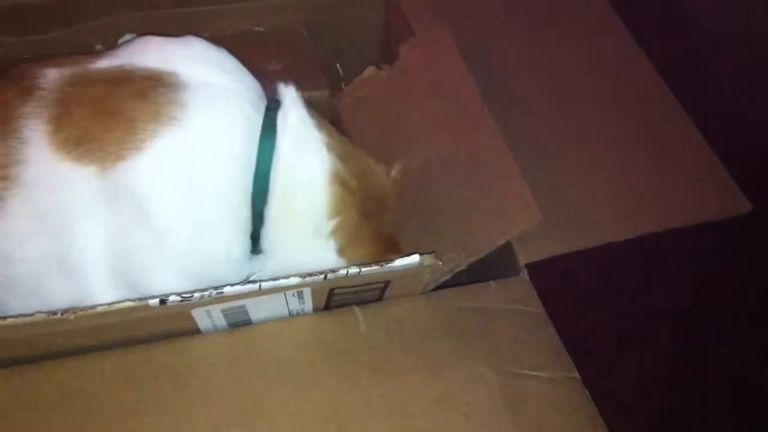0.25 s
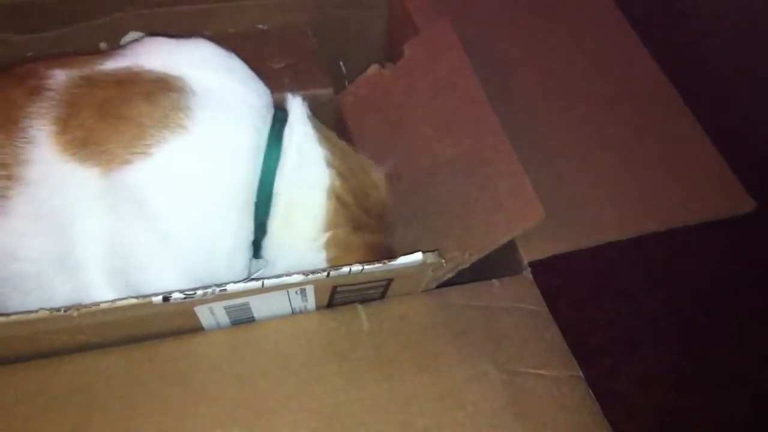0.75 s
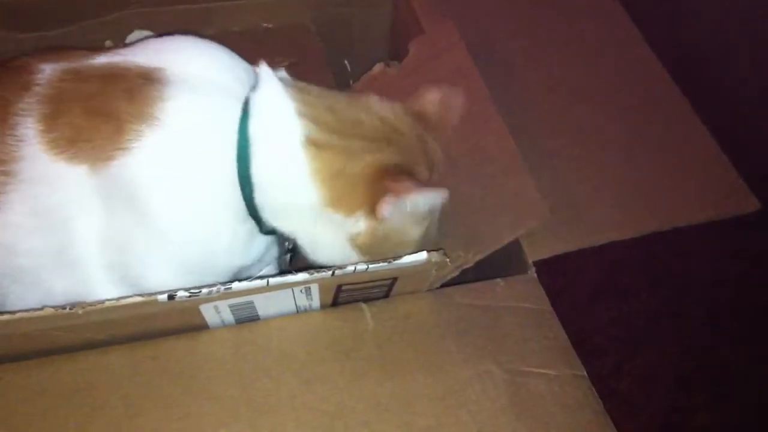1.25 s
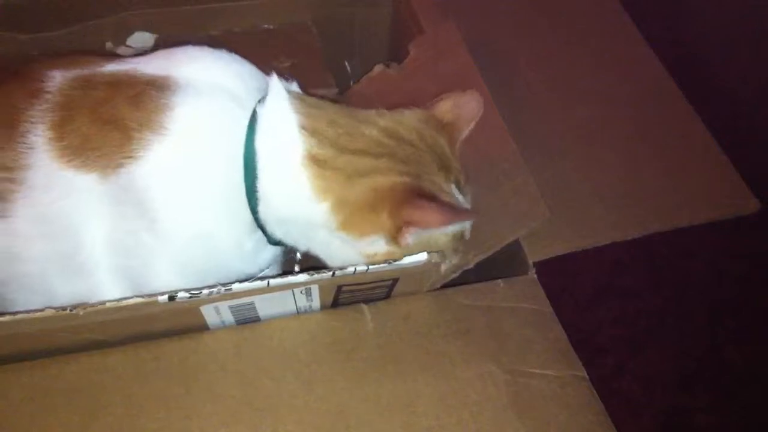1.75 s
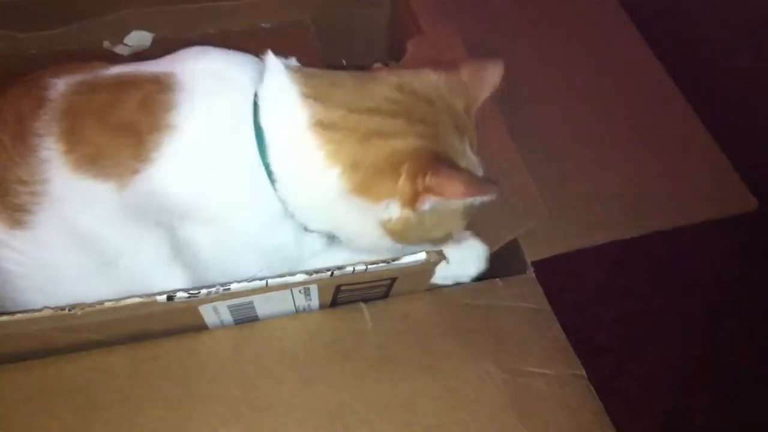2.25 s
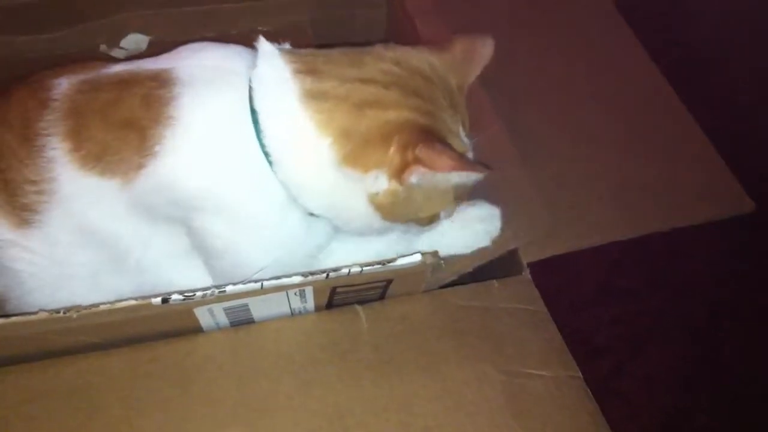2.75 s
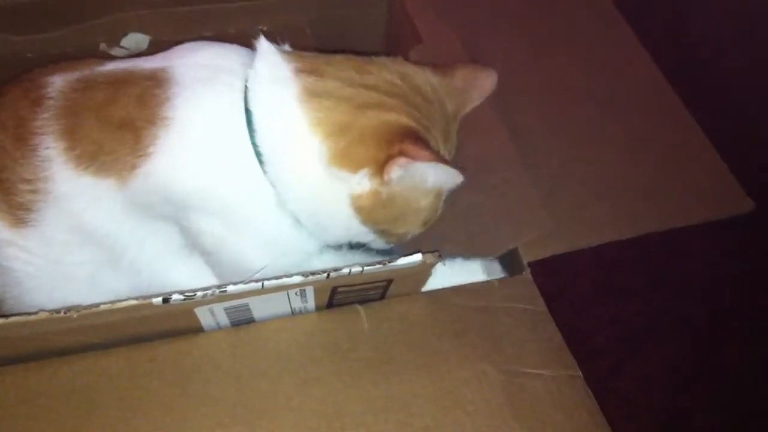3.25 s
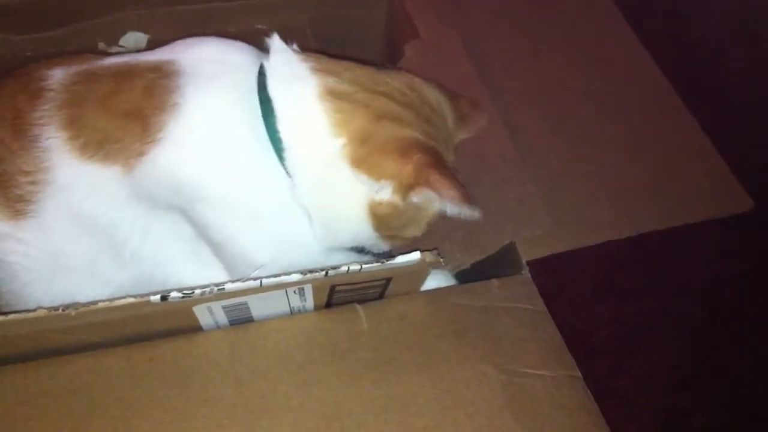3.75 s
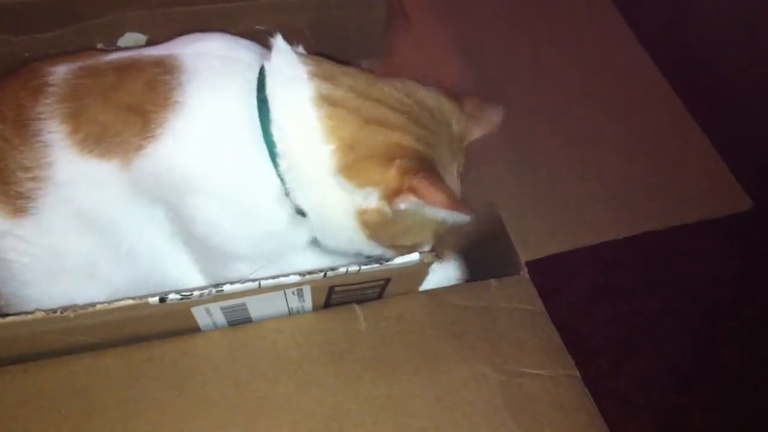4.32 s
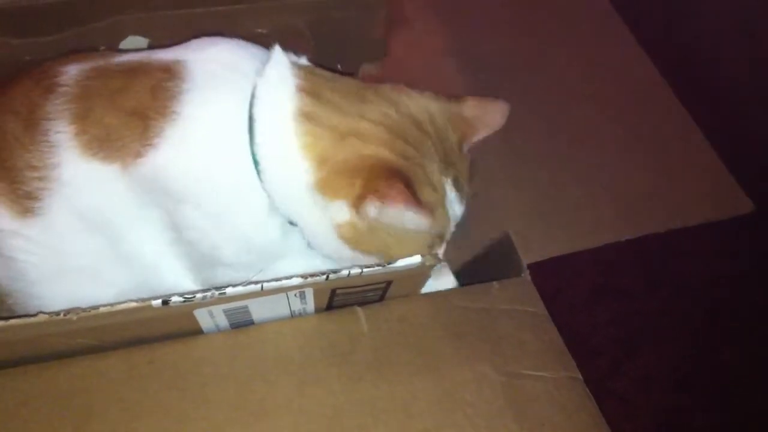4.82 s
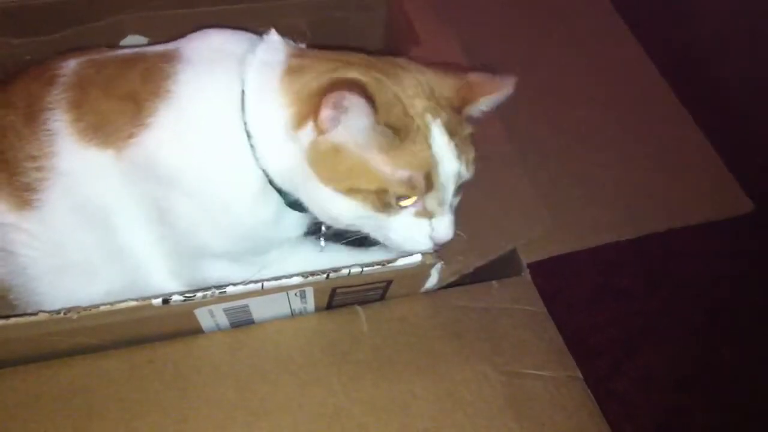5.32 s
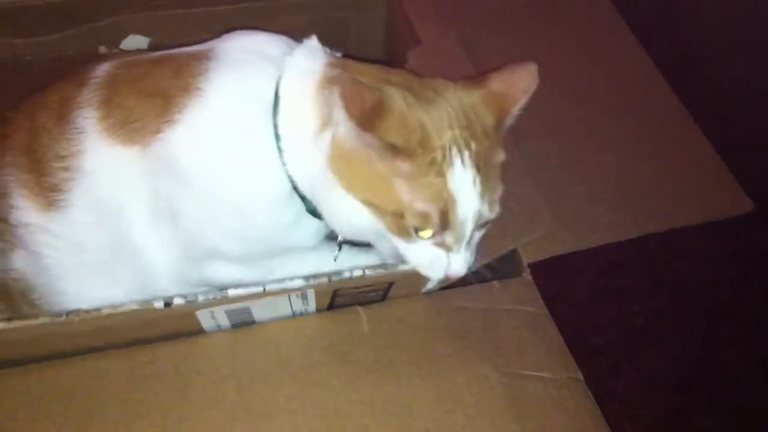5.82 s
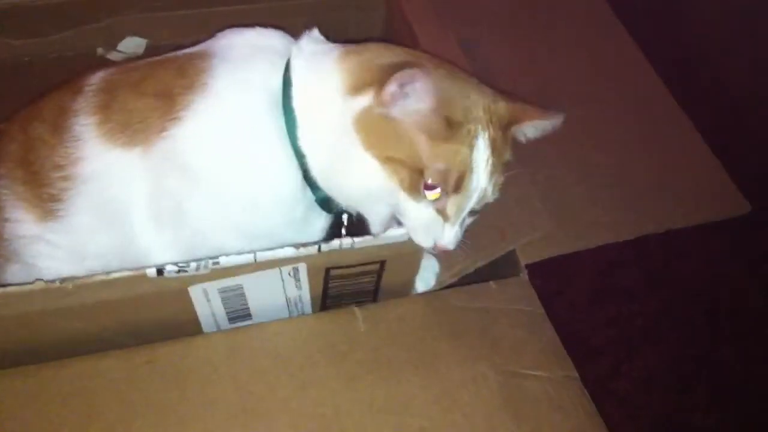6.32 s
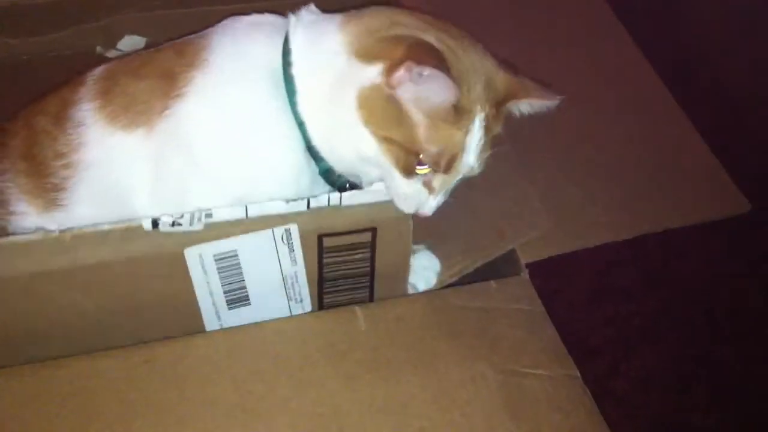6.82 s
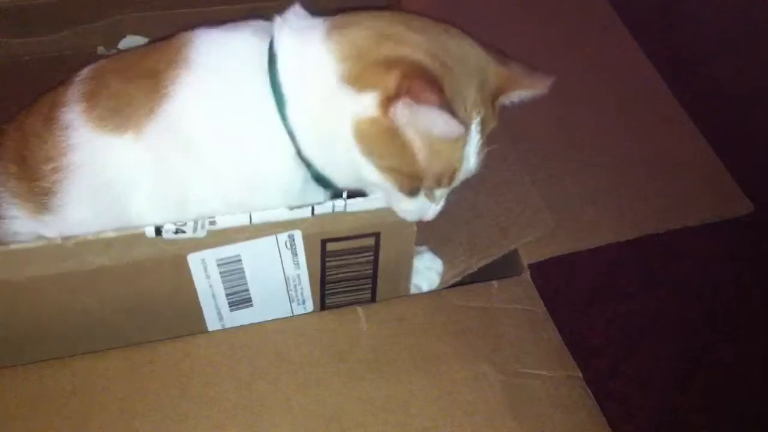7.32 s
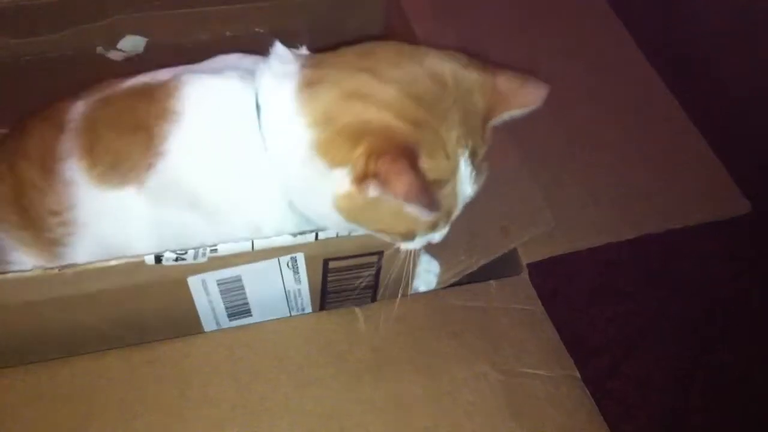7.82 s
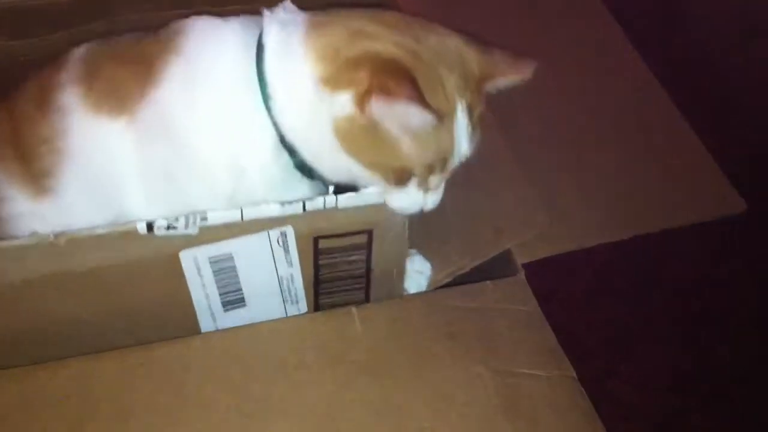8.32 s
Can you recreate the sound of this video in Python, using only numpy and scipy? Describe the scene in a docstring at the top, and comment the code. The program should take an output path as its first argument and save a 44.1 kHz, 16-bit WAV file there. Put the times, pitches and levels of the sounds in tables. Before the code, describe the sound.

Hollow cardboard flap snaps as a cat claws a box, with faint rustling, scratchy crackles and one dry knock.

```python
"""A cat plucking a cardboard box

A cat lying in a box hooks the edge of a flap with its claw; the card snaps back and the box rings. Between the
plucks come close rustles, crackles and ticks from fur, card and handling of the camera, and a tooth tapping the
stiff edge. A quiet, humming room gives back a short echo."""
import sys
import numpy as np
from scipy import signal
from scipy.fft import rfft, irfft, next_fast_len
from scipy.io import wavfile
from scipy.ndimage import uniform_filter1d

SR = 44100
rng = np.random.default_rng(int(sys.argv[2]) if len(sys.argv) > 2 else 0)


def master(y):
    """Save y as 16-bit WAV."""
    cut = np.clip(np.atleast_2d(y).T, -1, 1)
    pcm = np.round(cut * 32767)  # scale
    wavfile.write(sys.argv[1], SR, pcm.astype(np.int16))


N = 377937


def gain_of(db):
    """Turns decibels into a factor to multiply by."""
    return 10 ** (np.asarray(db) / 20)


def unit_level(x):
    """Scales a sound so that its average level (rms) is 1."""
    return x / np.sqrt(np.mean(x ** 2) + 1e-20)


def value_at(curve, hz):
    """Reads between the points of a curve, with pitch spaced in octaves."""
    points_hz, values = np.transpose(curve)
    return np.interp(np.log(hz + 1), np.log(points_hz + 1), values)


def add(mix, start_s, sound):
    """Mixes a sound in at the given time."""
    part = mix[round(start_s * SR):][:len(sound)]
    part += sound[:len(part)]


def filtered(x, spectrum):
    """Turns each pitch up or down, following (Hz, dB) points."""
    size = next_fast_len(len(x))
    gains = gain_of(value_at(spectrum, np.fft.rfftfreq(size, 1 / SR)))
    return irfft(rfft(x, size) * gains, size)[:len(x)]


def coloured(x, spectrum):
    """Filters a sound, then scales it to level 1."""
    return unit_level(filtered(x, spectrum))


# Room hum and microphone hiss. Each row: pitch in Hz, relative level in dB.
HUM_SPECTRUM = [(15, -57), (25, -16), (38, -29), (97, -15), (145, -3.5), (200, -2), (301, -2), (560, -13),
                (695, -16.5), (754, -10.5), (1070, -14.5), (1890, -16.5), (4250, -23), (16000, -25.5)]


def room_hum():
    """A steady hum and hiss with one faint, narrow drone."""
    drone = signal.lfilter(*signal.iirpeak(740, 30, SR), rng.standard_normal(N))
    hum = coloured(rng.standard_normal(N), HUM_SPECTRUM)
    return gain_of(-63) * (hum + gain_of(-16) * unit_level(drone))


# How long the room rings. Each row: pitch in Hz, seconds to fade by 60 dB (the "fade time").
ROOM_FADE = [(200, 0.5), (600, 0.3), (1500, 0.41), (4000, 0.28), (10000, 0.26)]


def room_echo(x, first_echo_s=0.01):
    """Many small echoes come off the walls, each pitch dying at its own speed."""
    echoes = np.zeros(SR // 2)
    slots = np.arange(round(first_echo_s * SR), len(echoes) - 20, 20)
    echoes[slots + rng.integers(0, 20, len(slots))] = rng.choice([-1., 1.], len(slots))
    hz, t, bands = signal.stft(echoes, SR, nperseg=256)
    bands *= gain_of(-60 * t / value_at(ROOM_FADE, hz)[:, None])
    spectrum = rfft(signal.istft(bands, SR, nperseg=256)[1])
    tail = irfft(spectrum / np.sqrt(uniform_filter1d(abs(spectrum) ** 2, size=60)))  # favour no pitch
    return signal.fftconvolve(x, tail / np.linalg.norm(tail))[:N]


# The bright, hissy treble of rustling close to the microphone.
# Each row: pitch in Hz, relative level in dB.
FIZZ_SPECTRUM = [(2000, -20), (3500, -11), (5500, -12), (6900, -16), (7700, -4), (10000, 0), (11200, -11),
                 (12500, -6), (14800, -2), (15700, -5), (16300, -20)]


def fizz(noise, sheen_hz=11200):
    """Turns noise into a bright fizz in two parts: the treble, and the very high "sheen" above it."""
    whole = coloured(noise, FIZZ_SPECTRUM)
    treble = signal.sosfiltfilt(signal.butter(6, sheen_hz, fs=SR, output="sos"), whole)
    return treble, whole - treble


def grains(per_s, spread_db, fade_s):
    """Rubbing surfaces catch and let go, making little puffs of noise of uneven size."""
    sizes = gain_of(spread_db * np.minimum(rng.exponential(1, N), 4))
    catches = rng.random(N) < per_s / SR
    puffs = signal.lfilter([1], [1, -np.exp(-1 / (fade_s * SR))], sizes * catches)
    return puffs * rng.standard_normal(N)


# The cat shifting its weight. Each row: time in seconds, treble level in dB, body level in dB.
WEIGHT_SHIFTS = [(0, -98, -88), (4.1, -81, -84.5), (4.5, -71, -81), (5.5, -79, -69.5), (6.3, -88, -68.5),
                 (6.7, -68.5, -63), (7.3, -67, -63), (7.601, -70.5, -69.5), (8.57, -71, -67.5)]
# Close rustles. Each row: start in seconds, length in seconds, treble level in dB,
# sheen in dB compared with the treble, body level in dB.
RUSTLES = [(1.949, 0.087, -65, -4, -66), (2.16, 0.079, -64.5, 0, -84), (2.488, 0.055, -64, 4, -56),
           (2.784, 0.15, -66, 1, -62), (3.04, 0.25, -64.5, 6.5, -63), (3.25, 0.11, -64, 3, -63),
           (3.348, 0.075, -64, 7, -61.5), (3.39, .17, -68, 5, -69.5), (3.564, 0.21, -65.5, 4, -66.5),
           (4.181, 0.15, -62.5, 2, -66), (4.384, 0.053, -67, 2, -68), (4.53, 0.26, -75, 13, -79),
           (4.74, 0.14, -72, 4, -73), (5.758, 0.16, -62.5, -5, -58.5), (5.911, 0.15, -72, -6, -60.5),
           (6.39, 0.08, -71, -2, -66), (6.756, 0.12, -51.5, -2, -56.5), (6.9, 0.11, -56, -6, -70),
           (7.004, 0.075, -59.5, -1, -68), (7.126, 0.099, -53, -3, -72), (7.2, 0.096, -52, 1, -57.5),
           (7.312, 0.11, -67, -5, -55.5), (7.781, 0.15, -66, -15, -58.5), (7.997, 0.14, -77, -4, -61.5),
           (8.218, 0.1, -69, -7, -58.5), (8.408, 0.087, -61, -4, -52.5), (8.505, 0.23, -58, -12, -41.5)]
# The lower sound, or body, of rubbed card. Each row: pitch in Hz, relative level in dB.
CARD_SPECTRUM = [(88, -40), (150, 8), (270, 2.5), (456, 4.5), (800, -2), (1300, 0.5), (1600, -3),
                 (2000, -2), (2860, -4.5), (6000, -34.5)]


def rustling(catch_db=-68.5):
    """Fur, card and handling of the camera make rustles that swell and fade over a faint stirring."""
    t = np.arange(N) / SR
    times, shift_treble_db, shift_body_db = np.transpose(WEIGHT_SHIFTS)
    treble_gain = gain_of(np.interp(t, times, shift_treble_db))
    body_gain = gain_of(np.interp(t, times, shift_body_db))
    sheen_gain = treble_gain.copy()
    for start, length, treble_db, sheen_db, body_db in RUSTLES:
        progress = np.arange(0, length, 1 / SR) / length
        up_down = np.interp(progress, [0, 0.57, 1], [0, 1, 0])  # loudest just past halfway
        swell = np.sin(np.pi / 2 * up_down) ** 1.44
        add(treble_gain, start, gain_of(treble_db) * swell)
        add(sheen_gain, start, gain_of(treble_db + sheen_db) * swell)
        add(body_gain, start, gain_of(body_db) * swell)
    fine_grain = unit_level(grains(per_s=2200, spread_db=2.5, fade_s=0.0016))
    jerks = unit_level(grains(per_s=90, spread_db=2.5, fade_s=0.0071))
    prickles = unit_level(grains(per_s=900, spread_db=5.9, fade_s=0.00052))
    drag = fine_grain + 1.06 * jerks
    rough = unit_level(0.5 * drag + prickles)
    # Above catch_db the surfaces catch and crackle; below it they brush smoothly.
    catch = treble_gain / (treble_gain + gain_of(catch_db))
    treble, sheen = fizz((1 - catch) * rng.standard_normal(N) + catch * rough)
    return treble_gain * treble + sheen_gain * sheen + body_gain * coloured(drag, CARD_SPECTRUM)


# Close crackles. Each row: start in seconds, rasp pitch in Hz, treble level in dB,
# sheen and rasp (both in dB compared with the treble), fade time in seconds.
CLOSE_CRACKLES = [(1.996, 2710, -56, -8, -1, 0.02), (3.388, 2490, -63.5, 17, 16.5, 0.015),
                  (3.615, 1840, -58, 5, 5.5, 0.11), (4.9118, 2630, -54, 4, -1.5, 0.049),
                  (5.597, 1800, -61.5, -16, 16.5, 0.012), (6.114, 2110, -61, -10, 7.5, 0.053),
                  (6.479, 2260, -41.5, -14, -15, 0.013), (6.74, 1430, -53, 1, 2.5, 0.04),
                  (6.796, 3000, -42.5, 1, -10, 0.028), (6.809, 2600, -45, 0, -14, 0.014),
                  (6.8296, 2550, -30.5, -6, -9, 0.011), (6.8673, 3300, -43, 5, 2, 0.0053),
                  (6.977, 1450, -50.5, -2, -2, 0.061), (7.095, 1800, -41, -3, -0.5, 0.079),
                  (7.145, 1490, -46.5, -6, -4, 0.044), (7.234, 1660, -48.5, -3, -5, 0.032),
                  (7.355, 2330, -49, -7, -4, 0.032), (7.861, 2520, -44.5, -11, -11, 0.017),
                  (8.0405, 2360, -69, -9, 13.5, 0.12), (8.4943, 2380, -57, -2, 5.5, 0.055),
                  (8.549, 2080, -68, -12, 7, 0.038)]


def crackling(rise_s=0.0019):
    """Card and handling of the camera make scratchy bursts that hold for a moment, then stop."""
    mix = np.zeros(N)
    t = np.arange(SR // 5) / SR
    for start, hz, db, sheen_db, rasp_db, fade_s in CLOSE_CRACKLES:
        rise = np.minimum(t / rise_s, 1) ** 2
        fall = gain_of(db - 60 * (np.maximum(t - rise_s, 0) / fade_s) ** 1.42)
        flicker_db = 2.6 * unit_level(uniform_filter1d(rng.standard_normal(len(t)), 30))
        scratch = gain_of(flicker_db) * rng.standard_normal(len(t))
        rasp = coloured(scratch, [(hz / 5, -28), (hz / 1.43, -10), (hz, 0),
                                  (hz * 1.3, -8), (hz * 1.72, -15), (hz * 4, -30)])
        treble, sheen = fizz(scratch)
        add(mix, start, rise * fall * (treble + gain_of(sheen_db) * sheen + gain_of(rasp_db) * rasp))
    return mix


# Close ticks. Each row: start in seconds, treble level in dB, sheen in dB compared with the treble.
CLOSE_TICKS = [(5.917, -53, 13), (6.534, -47, 3), (6.949, -48, -4), (7.0495, -41, 3), (7.163, -42, -3),
               (7.209, -49, 0), (7.2462, -35.5, -3), (7.25, -43, -3), (8.1973, -41, -9)]


def ticking(fade_s=0.008):
    """Tiny bright ticks come from the card and from handling of the camera."""
    mix = np.zeros(N)
    t = np.arange(SR // 5) / SR
    for start, db, sheen_db in CLOSE_TICKS:
        treble, sheen = fizz(rng.standard_normal(len(t)))
        add(mix, start, gain_of(db - 60 * t / fade_s) * (treble + gain_of(sheen_db) * sheen))
    return mix


# Tones of the card's stiff edge. Each row: pitch in Hz, relative level in dB, fade time in seconds.
EDGE_TONES = [(501, -6.5, 0.12), (820, -3, 0.025), (1345, -2.5, 0.047), (1610, 4.5, 0.034),
              (3050, -7, 0.013)]


def tooth_tap(build_s=0.0083):
    """A tooth scrapes harder and harder, slides off and drags on faintly; the edge rings roughly."""
    t = np.arange(SR // 5) / SR
    slide_off = gain_of(-60 * (t - build_s) / 0.036)
    drag_on = gain_of(-20.5 - 60 * t / 0.5)
    scrape = np.minimum(t / build_s, slide_off + drag_on) * rng.standard_normal(len(t))
    hz, db, fade_s = np.transpose(EDGE_TONES)[:, :, None]
    tones = gain_of(-60 * t / fade_s) * np.sin(2 * np.pi * hz * t)
    rings = signal.fftconvolve(tones, scrape[None], axes=1)[:, :len(t)]
    rings /= abs(rings).max(1, keepdims=True)
    return (gain_of(db) * rings).sum(0) / 2


# Tones of the box. Each row: pitch in Hz, relative level in dB, fade time in seconds.
# These are starting values: each knock varies them and limits the fade time.
BOX_TONES = [(216.6, -2, 0.18), (284, 4, 0.054), (337.8, -7, 0.17), (390.3, 2, 0.038), (527, -6.5, 0.067),
             (608.5, -6, 0.067), (768, 2.5, 0.031), (905, -5.5, 0.039), (1219, 2.5, 0.021),
             (1418, -6.5, 0.017), (1994, -10.5, 0.02), (2417, -16, 0.014), (2550, -14.5, 0.014),
             (2960, -19, 0.015)]


def box_ring(t, tilt_db, driven_hz, longest_fade_s=0.1):
    """The panels ring with many tones at once; those near driven_hz sound louder and longer."""
    hz, db, fade_s = np.transpose(BOX_TONES)[:, :, None]
    detune, uneven_db, phase = rng.standard_normal((3, *hz.shape))
    hz = hz * (1 + 0.02 * detune)  # each knock is detuned slightly at random
    driven = np.exp(-(np.log2(hz / driven_hz) / 0.076) ** 2)
    db = db + uneven_db + tilt_db * np.log2(hz / 800) + 9.4 * driven
    fade_s = np.minimum(fade_s * (1 + 0.36 * driven), longest_fade_s)
    rise = 1 - np.exp(-(t * (hz / 1000) ** 0.65 / 0.0017) ** 2)  # bass builds more slowly
    tones = np.sin(2 * np.pi * hz * t + 0.27 * phase)
    ring = (rise * gain_of(db - 60 * t / fade_s) * tones).sum(0)
    return ring / abs(ring).max()


def knock(tick_db, tilt_db, driven_hz):
    """A tick and a ring, as when the claw slips off and the flap swings back to shake the box."""
    t = np.arange(SR // 5) / SR
    ring = box_ring(t, tilt_db, driven_hz)
    # Countless small tones of the corrugated card merge into a papery crack.
    crack = coloured(rng.standard_normal(len(t)),
                     [(150, 0), (500, -3.5), (1500, 9.5), (3000, -2.5), (6000, -15.5), (9000, -22.5)])
    crack *= np.minimum(t / 0.0018, 1) * gain_of(-10 + 1.3 * tilt_db - 60 * t / 0.029)
    body = ring + crack
    tick = coloured(rng.standard_normal(len(t)), [(2500, -3), (5000, -23), (8000, -7), (14000, -50)])
    tick *= gain_of(-60 * t / 0.018)
    release = np.sin(2 * np.pi * np.minimum(t / 0.00049, 1)) * np.sin(np.pi * np.minimum(t / 0.00027, 1))
    return body / abs(body).max() + gain_of(tick_db) * (tick + 1.08 * release)


# Claw plucks and bumps on the box. Each row: start in seconds, blow level in dB, tick in dB compared with the
# blow, tilt towards treble in dB per octave, most driven pitch in Hz, echo in dB compared with the blow.
KNOCKS = [(2.414, -15.5, -17.5, 4, 704, -11), (2.6925, -13.5, -11.5, 5.5, 408, -11),
          (3.027, -16.5, -15, 3.5, 690, -11), (3.254, -34.5, -38, -0.4, 485, -7.5),
          (3.383, -46.5, -25, -5, 385, -3.5), (5.23, -17.5, -10.5, 4, 386, -12),
          (5.297, -25.5, -19, 2.1, 391, -10.5), (5.331, -30.5, -32, 2.5, 375, -9.5),
          (6.477, -32.5, -40, 7, 1340, -17), (6.865, -17.5, -22, 4, 1430, -14.5),
          (7.114, -40.5, -20, -2, 293, -9), (7.357, -47, -15, -5.5, 191, -1),
          (7.86, -41, -5, 1.5, 310, -19), (8.263, -45.5, -2, -3, 384, -6),
          (8.468, -28, -28, -5.5, 380, -19), (8.483, -30, -38, -6.5, 294, -18)]
# What the walls give back of a knock. Each row: pitch in Hz, boost or cut in dB.
ECHO_SPECTRUM = [(270, 2), (700, 5), (1250, -1.5), (2500, -0.5), (5000, 6), (8000, -1.5)]


def knocking(travel_s=0.0015, near_wall_s=0.018, push_s=0.0018):
    """Each blow reaches us through the air, off the walls and, as a faint low push, through the floor."""
    knocks, to_room, floor = np.zeros((3, N))
    push_time = np.arange(SR // 20) / SR / push_s
    push = np.e * push_time * np.exp(-push_time)
    for start, blow_db, tick_db, tilt_db, driven_hz, echo_db in KNOCKS:
        sound = gain_of(blow_db) * knock(tick_db, tilt_db, driven_hz)
        echo = gain_of(echo_db) * filtered(sound, ECHO_SPECTRUM)
        arrival = start + travel_s
        add(knocks, arrival, sound)
        add(knocks, arrival + near_wall_s, gain_of(-4) * echo)  # the nearest wall slaps back
        add(to_room, arrival, echo)
        add(floor, start, gain_of(blow_db - 43) * push)
    return knocks, to_room, floor


def scene():
    """The knocks and the rustling sound in the room, over its hum."""
    knocks, to_room, floor = knocking()
    rustle = rustling() + crackling() + ticking()
    add(rustle, start_s=4.909, sound=gain_of(-35.5) * tooth_tap())
    mix = knocks + rustle + room_echo(to_room + gain_of(-15.5) * rustle)
    bass_cut = signal.butter(3, 170, "high", fs=SR, output="sos")  # small panels give off little bass
    return (signal.sosfilt(bass_cut, mix) + floor + room_hum())[None]


def record(dry):
    """Cuts away the very highest treble, above 15850 Hz."""
    treble_cut = signal.firwin(511, 15850, window=("kaiser", 9), fs=SR)
    return signal.oaconvolve(dry, treble_cut[None], "same")


dry = scene()
out = record(dry)
master(out)
```